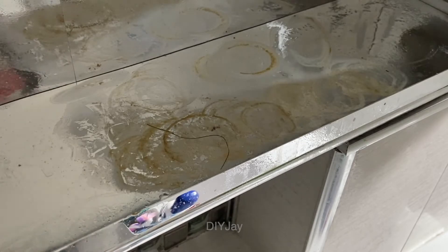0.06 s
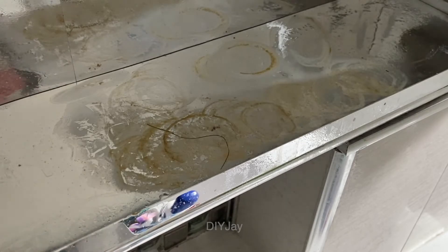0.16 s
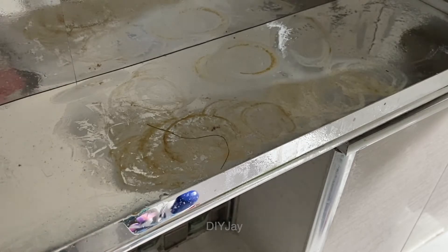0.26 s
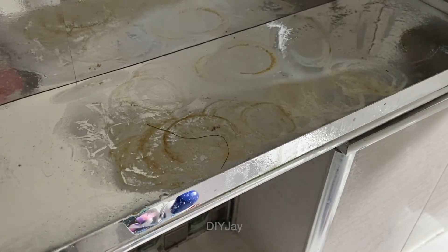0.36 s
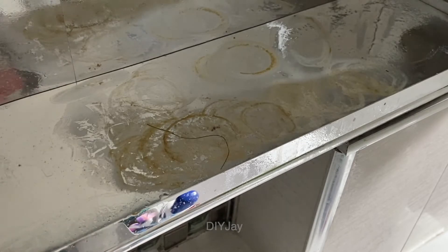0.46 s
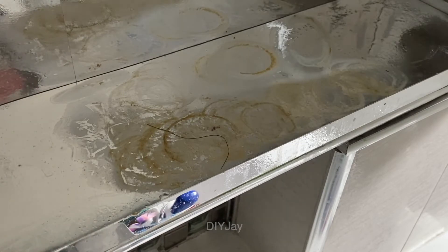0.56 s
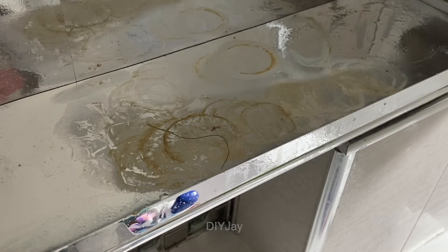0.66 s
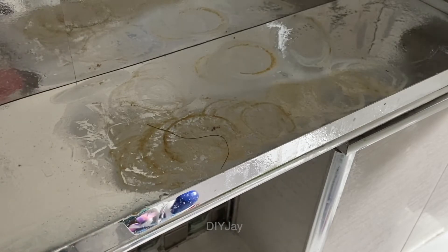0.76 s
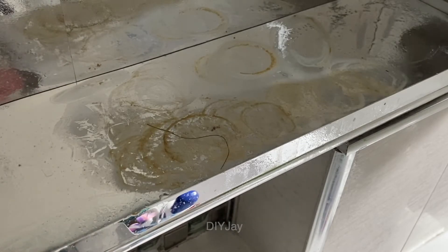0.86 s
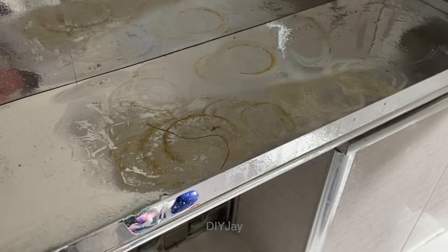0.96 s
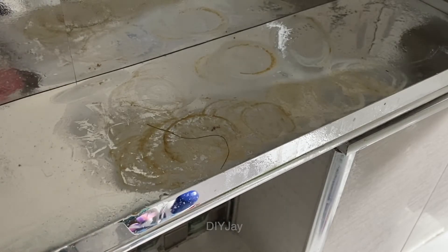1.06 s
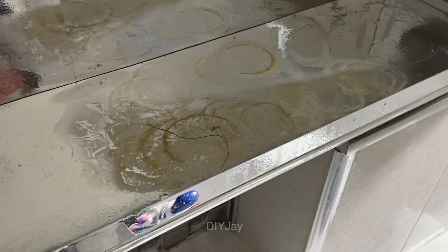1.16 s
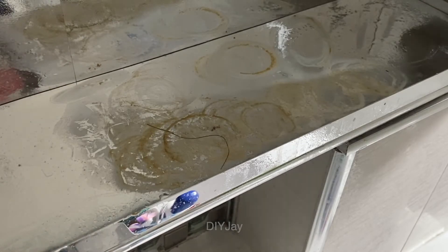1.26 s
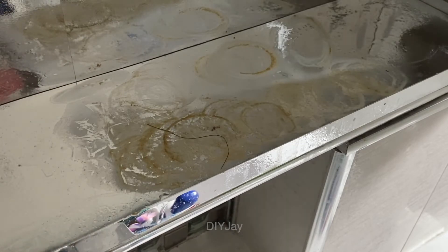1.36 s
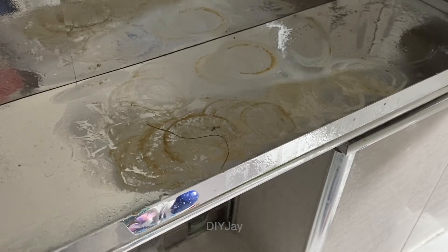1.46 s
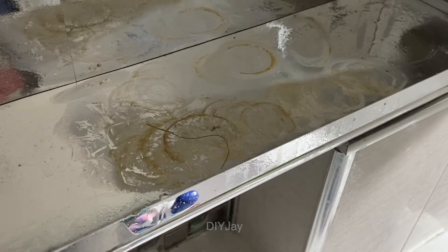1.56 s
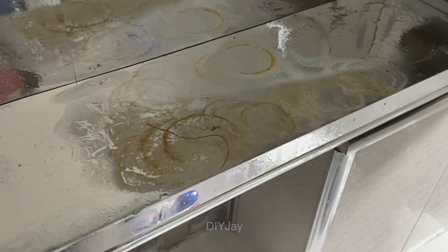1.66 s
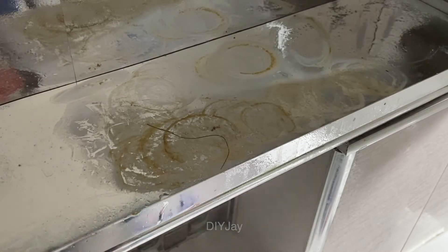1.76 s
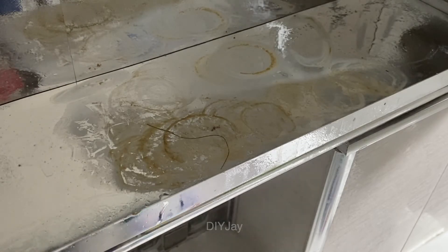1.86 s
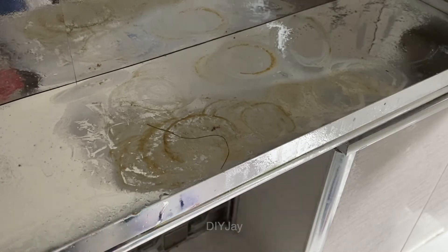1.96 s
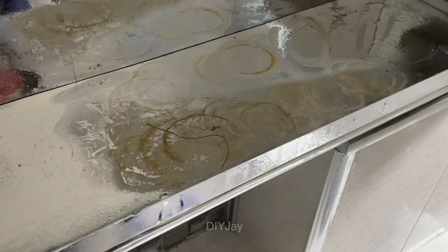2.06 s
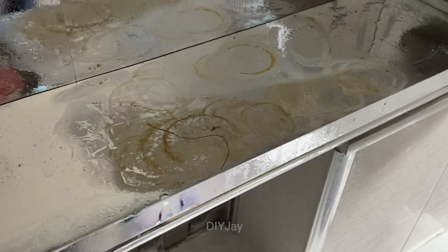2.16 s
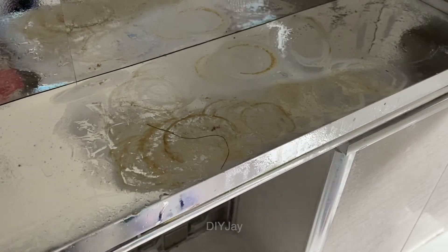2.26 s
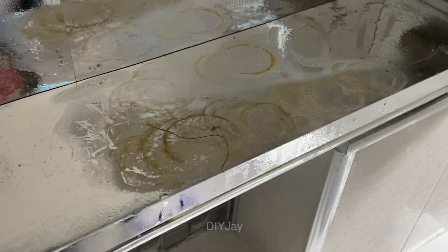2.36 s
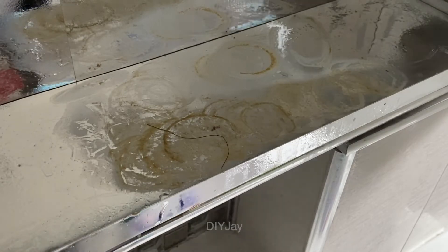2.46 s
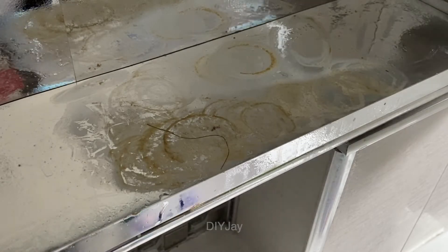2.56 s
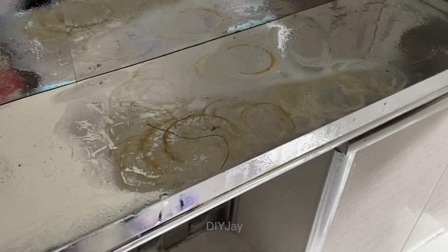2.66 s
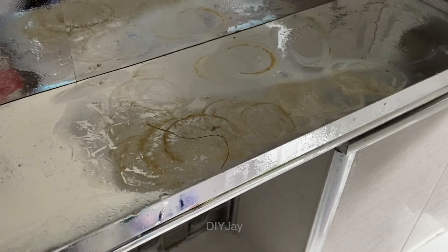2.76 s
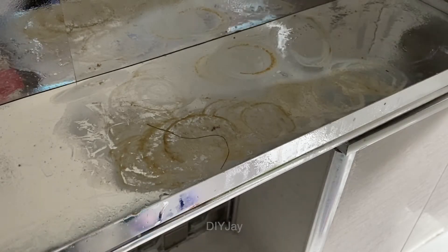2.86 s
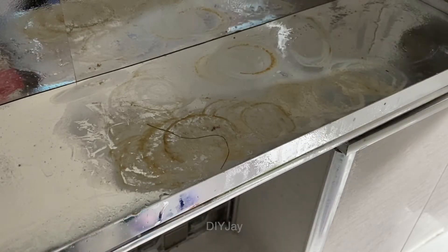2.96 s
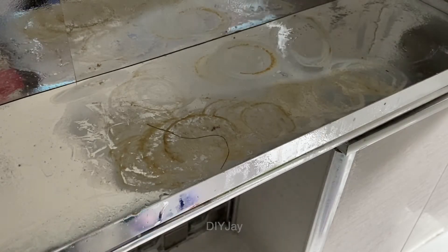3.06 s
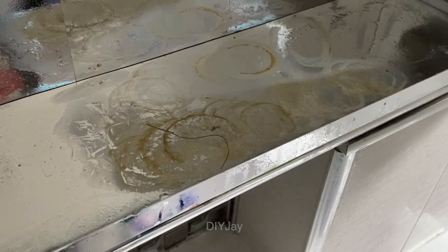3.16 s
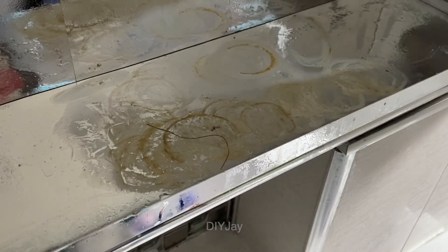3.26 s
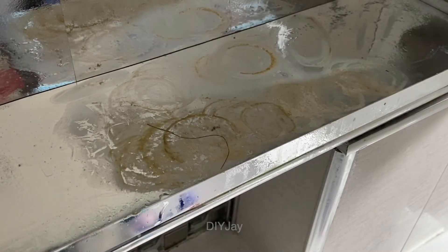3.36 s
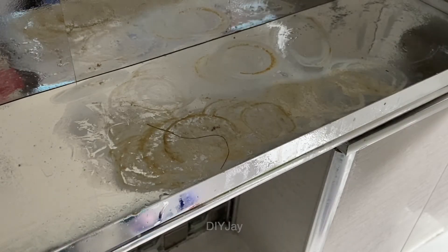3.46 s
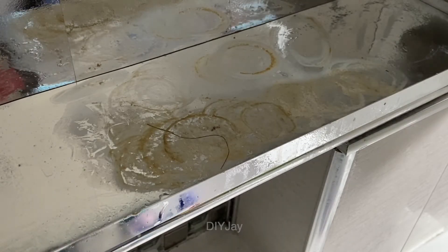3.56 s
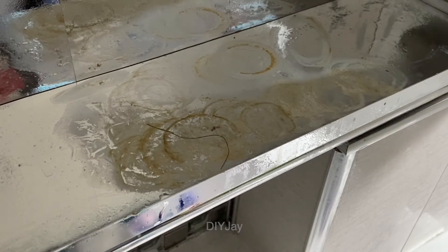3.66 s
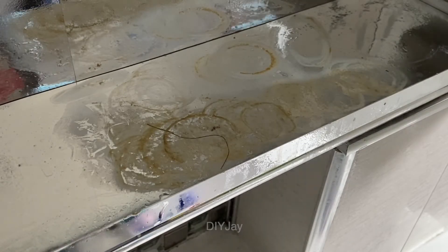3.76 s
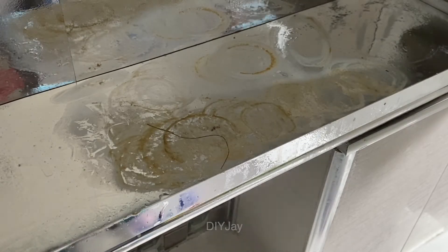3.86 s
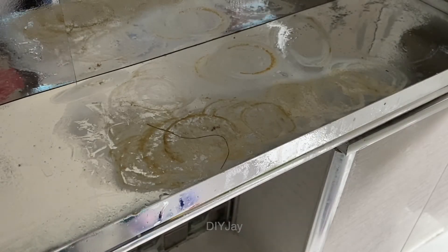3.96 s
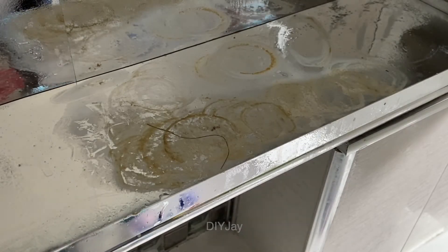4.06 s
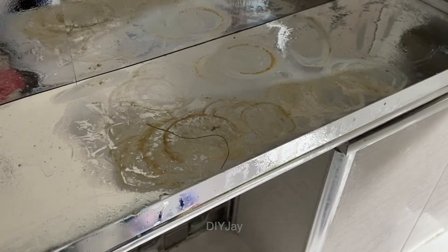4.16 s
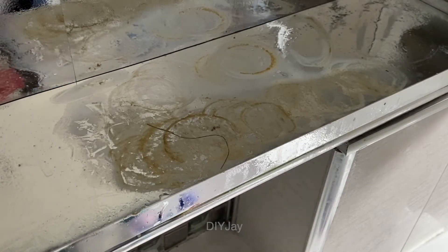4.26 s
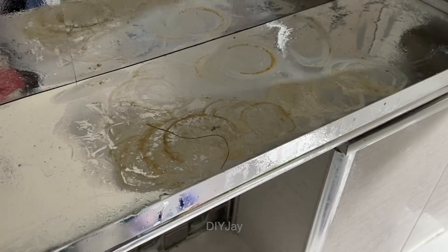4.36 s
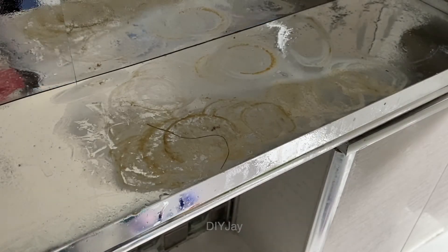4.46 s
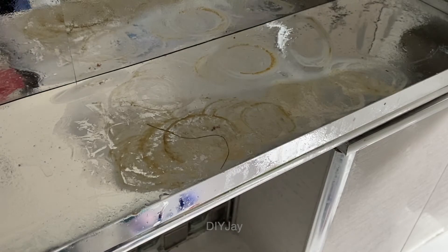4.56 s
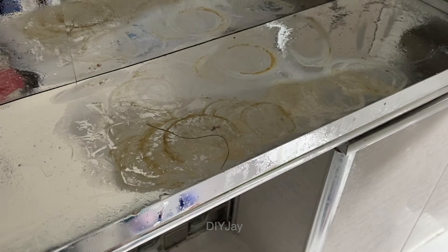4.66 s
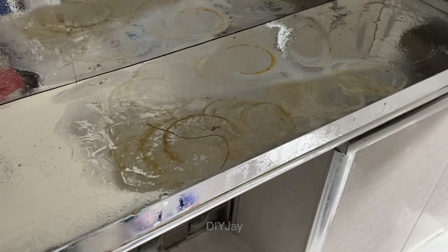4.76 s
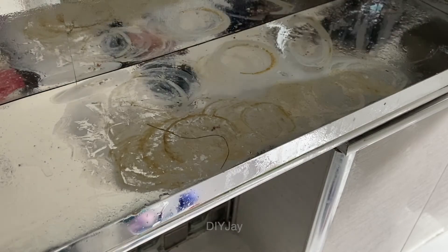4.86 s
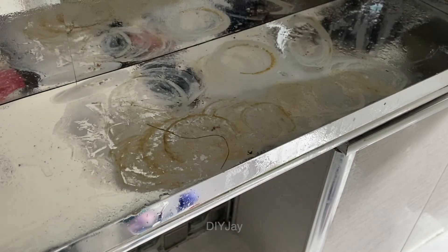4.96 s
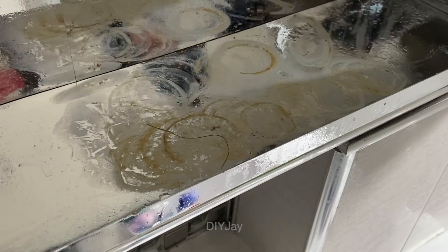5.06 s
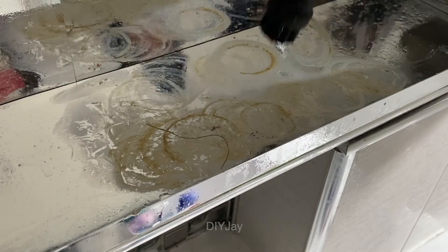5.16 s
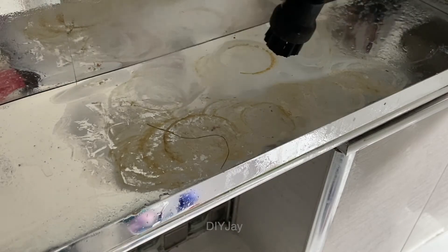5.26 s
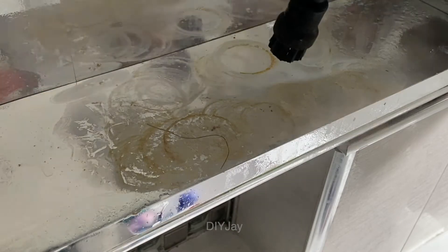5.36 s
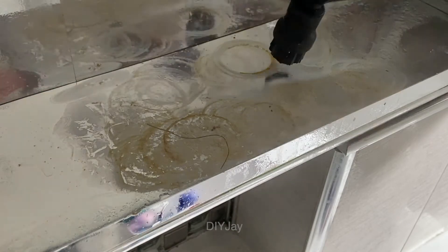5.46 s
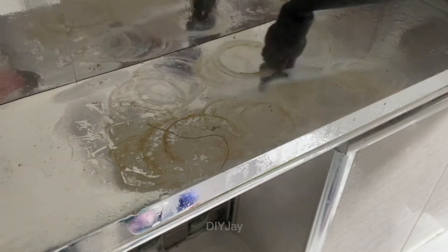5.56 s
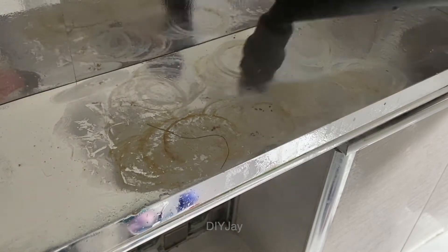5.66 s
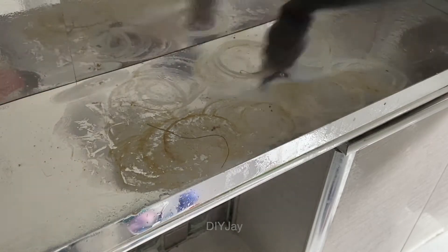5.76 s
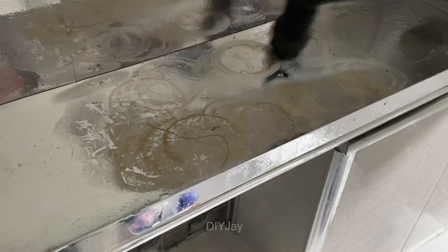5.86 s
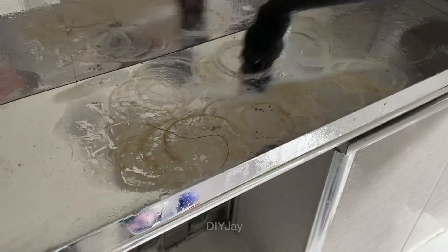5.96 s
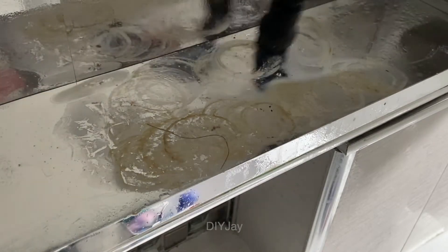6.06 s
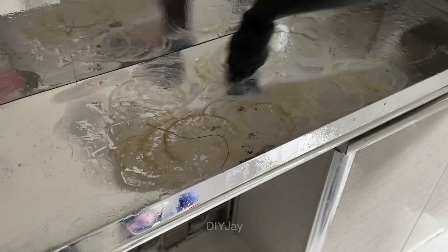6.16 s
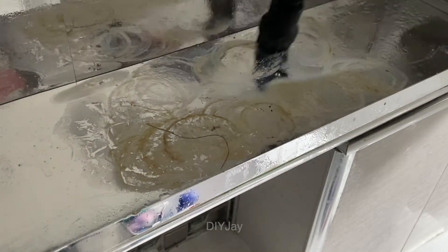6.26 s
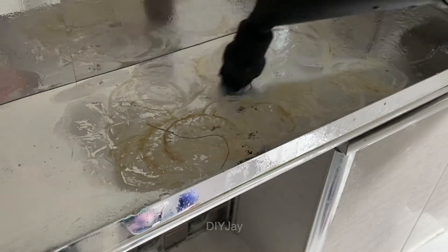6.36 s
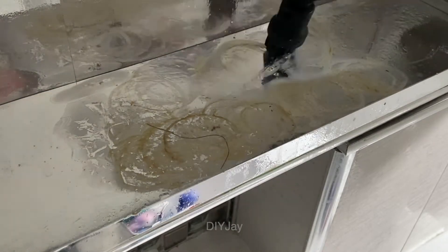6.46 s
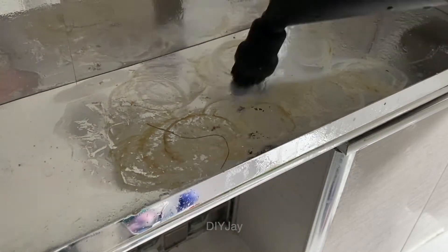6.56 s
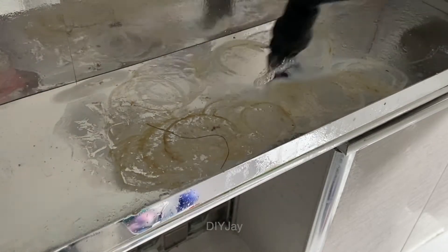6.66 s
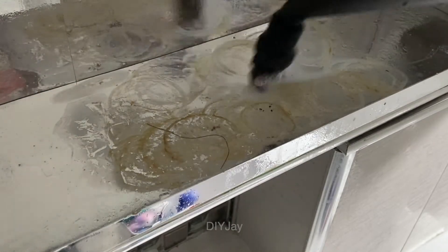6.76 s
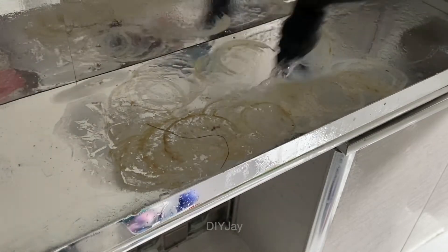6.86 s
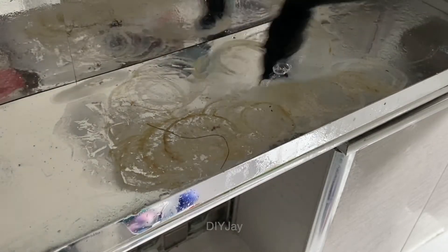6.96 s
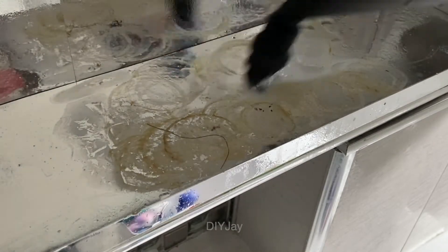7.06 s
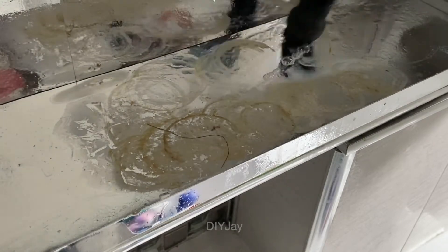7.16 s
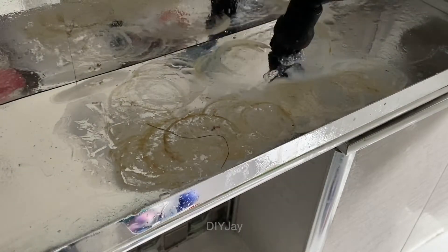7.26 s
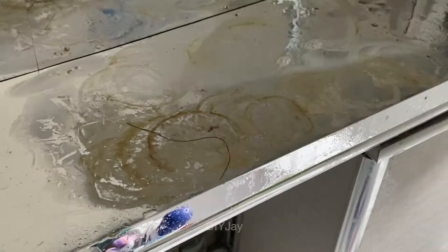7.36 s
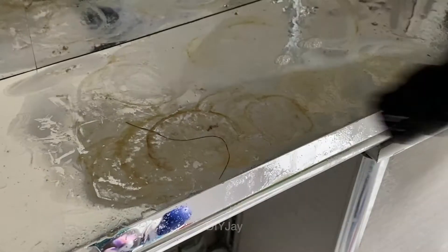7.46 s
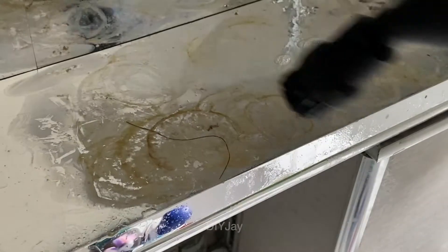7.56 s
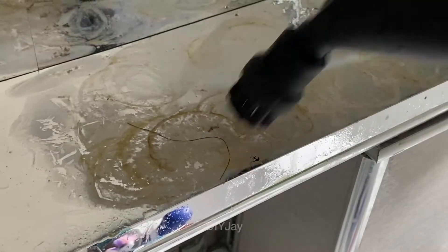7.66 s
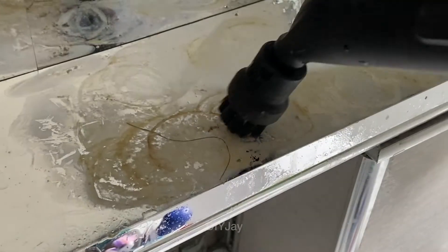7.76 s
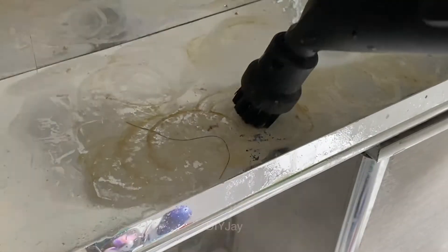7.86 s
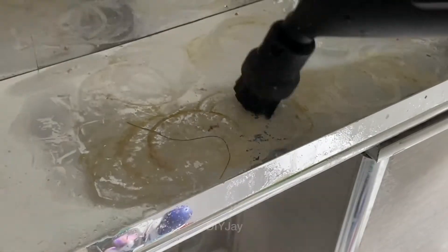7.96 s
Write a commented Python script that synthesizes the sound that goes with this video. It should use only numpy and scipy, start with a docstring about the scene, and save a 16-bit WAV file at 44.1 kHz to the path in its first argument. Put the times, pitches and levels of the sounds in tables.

```python
"""Steam cleaner on a wet ledge

A steam cleaner jets onto wet steel in a small tiled room: a long blast into a gap, then two on the open surface.
Each blast layers broad noise, a resonant hiss and droplet spatter; wavering noise bands squeal and burble.
The trigger valve thumps and clicks as decaying modes, while draught noise rumbles and mains harmonics hum.
"""
import sys
import numpy as np
from scipy import signal
from scipy.fft import rfft, irfft, next_fast_len
from scipy.io import wavfile
from scipy.ndimage import uniform_filter1d, map_coordinates

SR = 44100
rng = np.random.default_rng(int(sys.argv[2]) if len(sys.argv) > 2 else 0)


def waveform_to_disk(signal):
    """Save audio, clipped to [-1, 1], as 16-bit WAV at the path in sys.argv[1]."""
    frames = np.transpose(np.atleast_2d(signal))
    scaled = np.clip(frames, -1, 1) * 32767
    samples = np.round(scaled).astype(np.int16)
    wavfile.write(sys.argv[1], SR, samples)


N = 353241
T = np.arange(N) / SR  # time of each sample [s]

# Hum, third and fourth harmonics of the mains, before their unsteadiness: (time [s], level [dB])
HUM_THIRD = [(0, -60), (1.6, -68), (3.5, -64), (4.7, -63), (5.2, -58.5), (6.9, -62), (7.6, -57),
             (8.01, -60)]
HUM_FOURTH = [(0.0, -65), (0.24, -67), (0.62, -84), (0.96, -59), (3.96, -53.5), (4.88, -60), (5.21, -58),
              (7.93, -58), (8.0, -62)]  # lifted by a further 2 dB in hum()
# Hum, the other harmonics: (multiple of mains [-], level [dB])
HUM_OTHERS = [(2, -77), (5, -78.5), (6, -70.5), (8, -79), (9, -80), (10, -87), (13, -85), (14, -83.5)]
MAINS_HZ = 50.03

# Colour of the stirred draught and of the still room: (frequency [Hz], relative density [dB per Hz])
DRAUGHT_COLOUR = [(20, -28.5), (45, -5.5), (65, 2.5), (100, -2.5), (150, -8.5), (300, -22.5), (800, -58.5)]
ROOM_COLOUR = [(20, -17.5), (45, -4), (100, -4), (165, 6.5), (230, -2), (290, -5), (360, -11), (430, -12),
               (540, -16), (680, -16), (820, -26), (1600, -33.5), (2500, -39), (15000, -54.5)]
# Gusts of stirred air reaching the microphone: (time [s], length [s], level [dB])
GUSTS = [(0.01, 0.047, -50), (.735, 0.027, -46), (.85, 0.05, -48), (1.19, 0.092, -54), (1.65, 0.043, -50),
         (2.3, 0.055, -55), (2.92, .03, -56), (3.85, .1, -49), (4.8, .3, -68), (5.3, .15, -61)]
# Draught between gusts: level at the usual force, dB per dB of force, unevenness
DRAUGHT_DB, DRAUGHT_GROWS, DRAUGHT_SWING_DB = -62.5, 0.8, 3

# Pulls of the trigger, the first begun before the start and the last held past the end: (opens [s], shuts [s])
TRIGGER_PULLS = [(-.1, 3.918), (5.196, 7.3), (7.763, 8.1)]
OPEN_S, SHUT_S = 0.028, 0.011  # the valve's travel each way
SHUT_DROP_DB, BLEED_DB_PER_S = 13, 160  # loss of force as it seats, then as the wand empties

# The valve seats or lifts: (time [s], level [dB])
VALVE_THUMPS = [(3.925, -37.5), (7.307, -40), (7.705, -45), (7.764, -40)]
# The valve pin is pushed open: (time [s], level [dB])
PIN_CLINKS = [(7.739, -37.5), (7.764, -43)]
# The grip shifts: (time [s], level [dB])
GRIP_CLICKS = [(4.487, -63), (4.808, -53.5), (7.429, -55.5), (7.621, -61), (7.630, -51.5), (7.701, -50),
               (7.707, -48)]
# Ringing of hose, pin and plastic handle: (frequency [Hz], relative level [dB], 60 dB decay [s])
HOSE_MODES = [(85, -9.5, 0.1595), (137, -0.5, 0.1), (314, -1.5, 0.04), (564, -9, 0.028), (720, -14, 0.021)]
PIN_MODES = [(710, 1, 0.023), (1140, -6, .025), (3350, 1, 0.028), (5289, -13, 0.011), (7600, -15, .01)]
HANDLE_MODES = [(865, -3.5, 0.017), (1500, -6, 0.01), (2550, -5.5, .01), (4200, -15, .008)]
# The wand is shifted: (time [s], length [s], level [dB])
WAND_RUBS = [(4.45, .25, -84), (4.68, 0.19, -77), (4.83, .07, -79), (7.46, 0.11, -79), (7.66, 0.13, -80),
             (7.75, 0.032, -59)]
# Colour of the rubbing handle: (frequency [Hz], relative density [dB per Hz])
RUB_COLOUR = [(200, -9.5), (700, -1), (2500, -8.0), (7000, -11), (12000, -13), (15500, -24)]

# Water trapped in the gap squeals: (time [s], length [s], level before flutter [dB], pitch [Hz])
SQUEALS = [(.4, .45, -34.5, 6570), (1.9, .6, -38, 6500), (2.36, .06, -39, 5950), (2.58, .07, -38, 5950),
           (2.7, .07, -39.5, 5450), (2.94, .07, -36, 6150), (3.04, .08, -28, 6570), (3.08, .3, -42, 4850),
           (3.21, 0.076, -32.5, 6900), (3.44, 0.096, -36.5, 6700), (3.8, 0.14, -34, 6450)]
# The jet throws up a slug of water: (time [s], length [s], hollow burble before trim [dB], broad spit [dB])
SLUGS = [(1.368, .05, -45, -42), (1.48, 0.14, -47.5, -38), (1.7, 0.16, -49.5, -48),
         (2.075, 0.042, -50, -46), (2.272, 0.074, -52, -43), (2.678, .12, -48.5, -46),
         (2.866, 0.16, -48.5, -44), (3.125, 0.054, -47, -47), (3.772, 0.057, -45, -37),
         (5.688, 0.069, -51, -26.5), (6.332, .025, -29, -24), (6.557, 0.057, -42, -27),
         (7.026, .04, -39, -31.5), (7.14, 0.032, -44, -40)]
# Colour of the spit: (frequency [Hz], relative density [dB per Hz])
SPIT_COLOUR = [(100, -24.5), (300, -11.5), (700, -10), (1500, -10), (3000, 0), (5000, 5.5), (7000, -12.5),
               (15000, -20)]

# Force of the jet in the gap, on the ledge and close by: (time [s], force [dB])
GAP_FORCE = [(0.0, -22), (0.09, -22.5), (0.13, -23.5), (0.68, -28.5), (0.88, -22.5), (1.02, -27),
             (1.14, -23), (1.26, -26), (1.38, -22), (1.73, -28), (2.98, -28), (3.03, -27.5), (3.11, -30),
             (3.67, -29), (3.82, -24.5), (3.9, -32)]
LEDGE_FORCE = [(5.23, -34), (5.6, -27), (5.67, -21), (5.88, -20.5), (6.03, -25.5), (6.27, -19),
               (6.3, -15.5), (6.38, -20), (6.72, -21), (6.91, -30), (7.04, -30.5), (7.12, -35), (7.27, -38),
               (7.3, -44)]
NEAR_FORCE = [(7.785, -27), (7.83, -25.5), (7.9, -24), (8.01, -25)]
# Resonances between nozzle and surface: (frequency [Hz], width [Hz], relative level [dB])
GAP_MODES = [(4940, 690, -9), (5945, 830, -4.5), (6590, 260, -2), (6980, 450, -4.5), (7600, 480, -7.5)]
LEDGE_MODES = [(5060, 460, -0.5), (5660, 270, -4.5), (6310, 520, -3), (6770, 960, 0.5), (7810, 1100, -5.5)]
NEAR_MODES = [(2670, 450, 0), (5005, 360, -4), (5400, 160, 0), (5450, 120, -3.5), (6170, 200, -1),
              (6600, 380, -5), (8350, 450, -6.5)]
# Colour of rush and splash, in the gap and in the open: (frequency [Hz], relative density [dB per Hz])
GAP_RUSH = [(1200, -41), (1950, -11), (2450, -3.5), (3000, -0.5), (3500, 0), (4100, 0), (4450, 2.5),
            (5000, 1), (7000, 2), (8800, -8), (10000, -2.5), (13000, -4.5), (16000, -1)]
OPEN_RUSH = [(1200, -38), (2000, -10.5), (2450, -6.5), (2850, -1), (3300, 1.5), (3650, 0), (4100, 1.5),
             (4450, -1), (4800, 3.5), (7000, 0), (8600, -4), (10000, -3), (13000, -3), (16000, -4.5)]
GAP_SPLASH = [(70, -33), (140, -10.5), (300, -8.5), (480, -9), (650, -5), (790, -6), (950, -2.5),
              (1150, -2), (1350, -1), (1650, 0), (2100, 1), (2700, -2.5), (4000, -26), (8000, -59.5)]
OPEN_SPLASH = [(70, -28.5), (140, -2.5), (250, -13), (310, -3), (460, -5.5), (600, -14.5), (820, 0),
               (930, -3), (1080, -2), (1800, 0), (2080, 2), (2500, -1), (4000, -22), (8000, -58)]
# The nozzle comes square to the surface and its resonances flare: (time [s], length [s], gain [dB])
FLARES = [(.08, .08, 2.5), (5.8, .07, 5), (6.107, 0.097, 0), (6.3, 0.033, 2), (6.45, .1, 2),
          (6.642, 0.19, 3), (7.244, .14, 2.5)]
# Nozzle position: (time [s], lag of the surface echo [ms], echo strength [0-1], gurgle [dB])
NOZZLE = [(.4, 1.22, .22, 1), (1.3, 1.28, .15, 2.3), (2.6, 0.93, 0, 3), (3.3, 0.96, 0.17, 4),
          (3.92, 1.04, 0.17, 1), (5.2, 1.92, 0.11, 5), (8.01, 1.88, 0.02, 0.5)]
USUAL_FORCE_DB = -27
SPLASH_GROWS = 0.57  # dB of splash per dB of force above the usual

# Decay of the tiled room: (frequency [Hz], 60 dB decay [s])
ROOM_DECAY = [(100, 0.35), (500, .25), (2000, 0.28), (6000, 0.089), (15000, 0.31)]
# Stereo width of the sound: (frequency [Hz], side gain [dB])
STEREO_WIDTH = [(40, -17), (100, -13), (200, -11.5), (380, -8.5), (700, -7), (1300, -5), (1900, -8),
                (2350, -25), (3000, -32), (4300, -28), (5200, -19), (6600, -19), (7200, -24), (9000, -17),
                (16000, -18)]
# Stereo balance of the low end: (frequency [Hz], left minus right [dB])
STEREO_BALANCE = [(50, .2), (100, .8), (180, 2.6), (350, 1.6), (700, 2.8), (1400, 2), (2300, 0)]
# Stereo phase of the treble: (frequency [Hz], left minus right [rad])
STEREO_PHASE = [(7300, 0), (8080, -.3), (8350, -2.1), (8650, -3.05), (9550, -3.2), (10600, -6.2),
                (11600, -6.4), (12800, -9.35), (13750, -9.5), (14700, -12.5)]
TOP_HZ = 15920  # nothing passes above


def amp(db):
    """Decibels to gain."""
    return 10 ** (np.asarray(db) / 20)


def unit(x):
    """x at rms 1."""
    return x / np.sqrt(np.mean(x ** 2) + 1e-20)


def along(points, hz):
    """(Hz, value) points read on a log axis."""
    f, v = np.transpose(points)
    return np.interp(np.log(hz + 1), np.log(f + 1), v)


def curves(rows):
    """One value per sample for each column after the time."""
    s, *cols = np.transpose(rows)
    return [np.interp(T, s, c) for c in cols]


def wobble(rate):
    """A smooth random curve, rate knots a second."""
    coarse = np.append(T[::8], T[-1])
    knots = rng.standard_normal(int(N * rate / SR) + 4)
    return np.interp(T, coarse, map_coordinates(knots, [coarse * rate]))


def bump(s, length):
    """A smooth rise and fall around time s, length seconds wide at half height."""
    return np.exp(-np.minimum(np.log(2) * (2 * (T - s) / length) ** 2, 60))


def swells(events):
    """The gain of (s, length s, dB) swells."""
    return sum(amp(db) * bump(s, length) for s, length, db in events)


def filtered(x, response):
    """x times a complex response of frequency."""
    m = next_fast_len(N + SR // 2)
    return irfft(rfft(x, m) * response(np.fft.rfftfreq(m, 1 / SR)), m)[..., :N]


def coloured(x, spectrum):
    """x through a (Hz, dB) spectrum, at rms 1."""
    return unit(filtered(x, lambda hz: amp(along(spectrum, hz))))


def resonant(x, modes):
    """x through resonances that add in power, thinned in the low end, at rms 1."""
    def response(f):
        power = sum((amp(db) * f * w) ** 2 / ((c * c - f * f) ** 2 + (f * w) ** 2) for c, w, db in modes)
        return np.sqrt(power) * f ** 2 / (f ** 2 + 2500 ** 2)

    return unit(filtered(x, response))


def eddies(patchy_db):
    """Turbulent noise whose strength comes and goes in small patches of time and pitch."""
    _, s, z = signal.stft(rng.standard_normal(N), SR, nperseg=512)
    field = rng.standard_normal(z.shape)
    for _ in range(2):
        field = uniform_filter1d(field, size=3, axis=0)
        field = uniform_filter1d(field, size=9, axis=1)
    depth = np.interp(s, T, patchy_db * np.ones(N))
    gain = amp(depth * unit(field) - depth ** 2 * np.log(10) / 20)  # mean power stays the same
    return signal.istft(z * gain, nperseg=512)[1][:N]


def droplets(rate, spread_db):
    """Random impacts of very unequal size, rate a second, at rms 1."""
    hits = rng.random(N) < rate / SR
    sizes = amp(spread_db * np.minimum(rng.exponential(size=N), 3))
    return unit(hits * rng.choice([-1, 1], N) * sizes)


def narrow(centre_hz, width_hz, wander, rate):
    """A narrow band of noise whose pitch wanders, at rms 1."""
    phase = 2 * np.pi * np.cumsum(centre_hz * np.exp(wander * wobble(rate))) / SR
    return unit(wobble(width_hz) * np.cos(phase) + wobble(width_hz) * np.sin(phase))


def struck(events, modes, crack):
    """Each (s, dB) blow rings the modes at new strengths, with a short crack of noise."""
    out, t = np.zeros(N + SR), np.arange(SR // 3) / SR
    for s, db in events:
        ring = sum(amp(level + rng.normal(0, 2.3) - 60 * t / t60) * np.sin(2 * np.pi * hz * t)
                   for hz, level, t60 in modes)
        snap = crack * amp(-60 * t / 0.012) * rng.standard_normal(len(t))
        out[round(s * SR):][:len(t)] += amp(db) * (ring + snap)
    return out[:N]


def valve(opens, shuts):
    """The flow rises as the valve opens and drops as it seats; then the wand bleeds empty."""
    opening = np.clip((T - opens) / OPEN_S, 0, 1) ** 2
    after = np.maximum(T - shuts, 0)
    return opening * amp(-SHUT_DROP_DB * np.minimum(after / SHUT_S, 1) - BLEED_DB_PER_S * after)


def tiles(x):
    """The hard walls answer with a noise tail; each frequency dies at its own speed."""
    hz, t, z = signal.stft(rng.standard_normal(SR // 2), SR, nperseg=256)
    decay = amp(-60 * t / along(ROOM_DECAY, hz)[:, None])
    tail = signal.istft(z * decay, SR, nperseg=256)[1]
    return signal.fftconvolve(x, tail / np.linalg.norm(tail))[:N]


def hum():
    """Harmonics of the mains, each slightly unsteady; the third and fourth also swell and fade slowly."""
    def line(order, db):
        phase = 2 * np.pi * (order * MAINS_HZ * T + rng.random())
        return amp(db + 1.3 * wobble(5.5)) * np.sin(phase)

    third = line(order=3, db=curves(HUM_THIRD)[0])
    fourth = line(order=4, db=curves(HUM_FOURTH)[0] + 2)
    return third + fourth + sum(line(order, db) for order, db in HUM_OTHERS)


def air():
    """The jet stirs an uneven draught with a few stronger gusts, over the still room's murmur."""
    force_db, = curves(GAP_FORCE + LEDGE_FORCE + NEAR_FORCE)
    growth_db = DRAUGHT_GROWS * (force_db - USUAL_FORCE_DB)
    stirred = amp(DRAUGHT_DB + growth_db + DRAUGHT_SWING_DB * wobble(16))
    gap, ledge, near = [valve(*pull) for pull in TRIGGER_PULLS]
    flow = gap + amp(-5) * (ledge + near)  # the gap funnels the draught
    draught = (flow * stirred + swells(GUSTS)) * coloured(rng.standard_normal(N), DRAUGHT_COLOUR)
    return draught + amp(-65) * coloured(rng.standard_normal(N), ROOM_COLOUR)


def wand():
    """The valve thumps through the hose, its pin clinks, and the plastic handle ticks and rubs."""
    thumps = struck(VALVE_THUMPS, HOSE_MODES, crack=0.05)
    clinks = struck(PIN_CLINKS, PIN_MODES, crack=0.46)
    ticks = struck(GRIP_CLICKS, HANDLE_MODES, crack=0.39)
    rub = coloured(rng.standard_normal(N) + 0.3 * droplets(rate=200, spread_db=5), RUB_COLOUR)
    return thumps + clinks + ticks + swells(WAND_RUBS) * rub


def puddle():
    """Pockets of water squeal and waver under the jet; slugs burble and spit as they are thrown up."""
    squeal = sum(amp(db) * bump(s, length) * narrow(hz, width_hz=140, wander=0.02, rate=27)
                 for s, length, db, hz in SQUEALS)
    burble = narrow(1230, width_hz=520, wander=0.14, rate=70)
    spit = coloured(eddies(patchy_db=3.5) + 0.5 * droplets(rate=770, spread_db=4.5), SPIT_COLOUR)
    burbling = swells([(s, length, db) for s, length, db, _ in SLUGS])
    spitting = swells([(s, length, db) for s, length, _, db in SLUGS])
    fluttering = amp(2.5 * wobble(40)) * squeal
    return fluttering + burbling * amp(-2.8 + 1.8 * wobble(70)) * burble + spitting * spit


def blast(flow, force, modes, rush_shape, splash_shape, rush_db, hiss_db, splash_db, bright_db, wet):
    """One trigger pull: its force drives broad jet noise, resonant hiss, and condensed water spattering steel."""
    force_db, gurgle_db = curves(force)[0], curves(NOZZLE)[2]
    flare_db = sum(db * bump(s, length) for s, length, db in FLARES)

    rush = coloured(eddies(patchy_db=2) + wet * droplets(rate=1600, spread_db=4.5), rush_shape)
    # treble beams along the jet
    rush = filtered(rush, lambda hz: amp(bright_db * np.clip((hz - 5000) / 5000, 0, 1)))
    hiss = resonant(eddies(gurgle_db) + wet * droplets(rate=800, spread_db=8), modes)
    splash = coloured(eddies(patchy_db=1.5) + wet * droplets(rate=250, spread_db=3.5), splash_shape)

    sputter = amp(0.45 * wobble(35) + wet * wobble(160))  # slugs of water choke the nozzle
    hiss_gain = amp(hiss_db + flare_db + 0.65 * wobble(28))
    jet = amp(force_db) * (amp(rush_db) * rush + hiss_gain * hiss)
    growth_db = SPLASH_GROWS * (force_db - USUAL_FORCE_DB)
    spatter = amp(splash_db + growth_db + 1.4 * wobble(45)) * splash
    return flow * sputter * (jet + spatter)


def steam():
    """Three blasts and their water; the echo off the surface combs them and slides as the nozzle moves."""
    gap, ledge, near = [valve(*pull) for pull in TRIGGER_PULLS]
    jet = puddle()
    jet += blast(gap, GAP_FORCE, GAP_MODES, GAP_RUSH, GAP_SPLASH,
                 rush_db=-6, hiss_db=-1.6, splash_db=-49.8, bright_db=2.6, wet=0.29)
    jet += blast(ledge, LEDGE_FORCE, LEDGE_MODES, OPEN_RUSH, OPEN_SPLASH,
                 rush_db=-3.6, hiss_db=-4.5, splash_db=-41.3, bright_db=1.6, wet=0.4)
    jet += blast(near, NEAR_FORCE, NEAR_MODES, OPEN_RUSH, OPEN_SPLASH,
                 rush_db=-0.5, hiss_db=-3.0, splash_db=-40.5, bright_db=1.0, wet=0.57)
    lag_ms, strength, _ = curves(NOZZLE)
    echo = map_coordinates(jet, [(T - lag_ms / 1000) * SR])
    return jet + strength * echo


def scene():
    """Steam, wand and air in the room over the hum; wide in the low mids, nearly mono from 2.3 to 4.3 kHz."""
    direct, murmur = steam() + wand(), air()
    mid = direct + amp(-8) * tiles(direct) + murmur
    side = filtered(tiles(direct + murmur), lambda hz: amp(along(STEREO_WIDTH, hz)))
    return np.array([mid + side, mid - side]) + hum()


def record(dry):
    """Left and right differ in low-end gain and treble phase, and nothing passes above the band limit."""
    half = np.array([[0.5], [-0.5]])  # left and right share each difference

    def left_right(hz):
        return amp(half * along(STEREO_BALANCE, hz)) * np.exp(1j * half * along(STEREO_PHASE, hz))

    stereo = filtered(dry, left_right)
    return filtered(stereo, lambda hz: np.clip((TOP_HZ - hz) / 200, 0, 1) ** 2)


dry = scene()
out = record(dry)
waveform_to_disk(out)
```